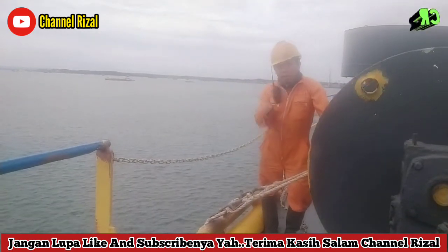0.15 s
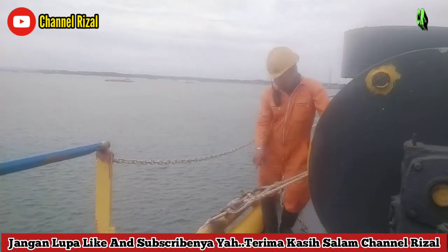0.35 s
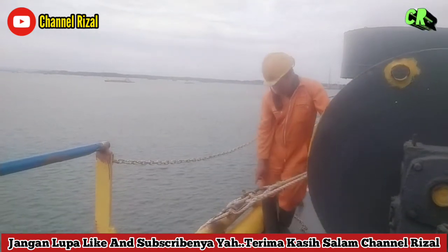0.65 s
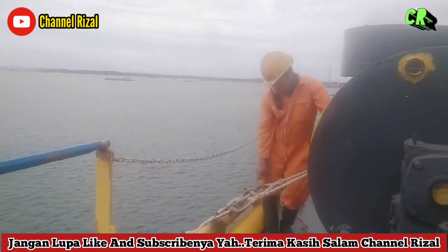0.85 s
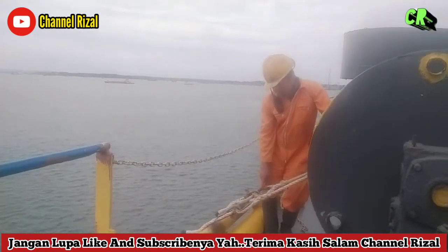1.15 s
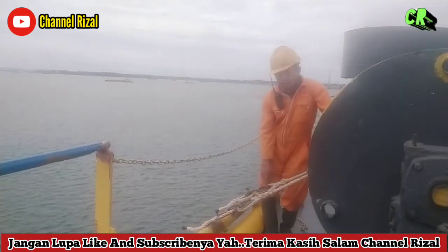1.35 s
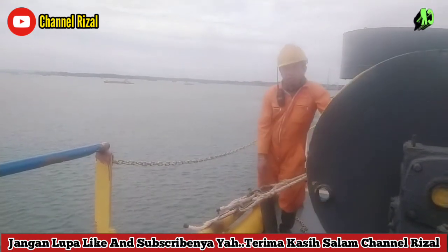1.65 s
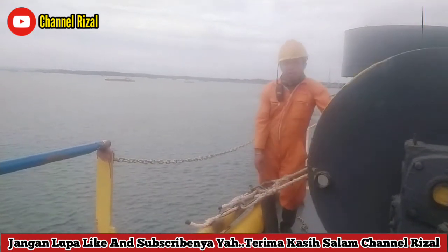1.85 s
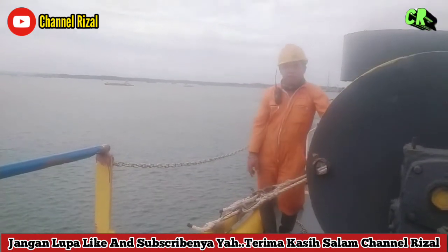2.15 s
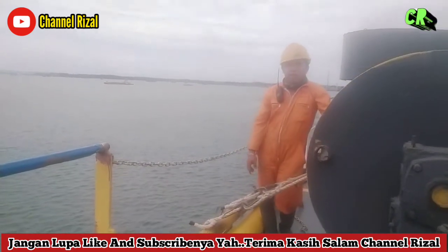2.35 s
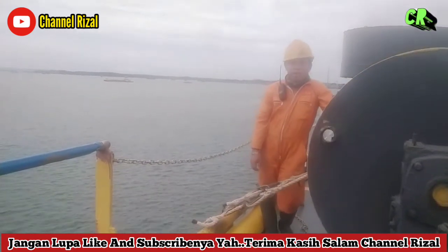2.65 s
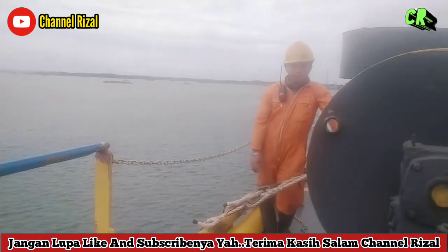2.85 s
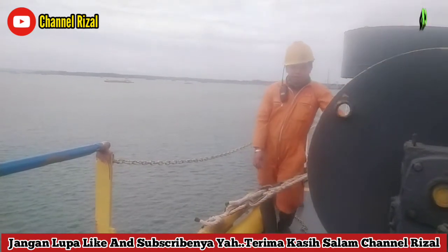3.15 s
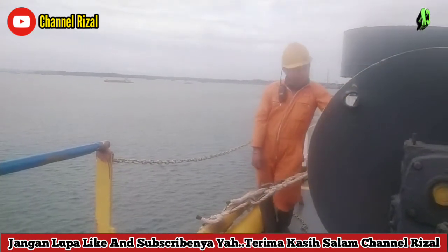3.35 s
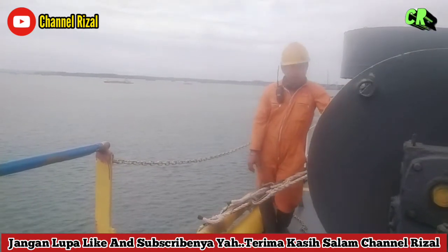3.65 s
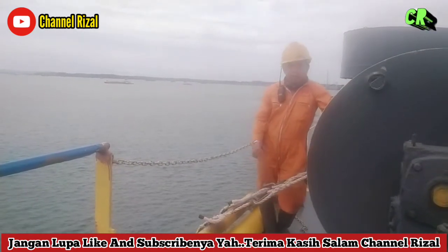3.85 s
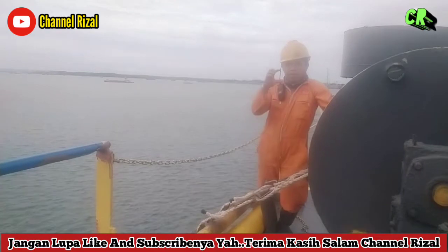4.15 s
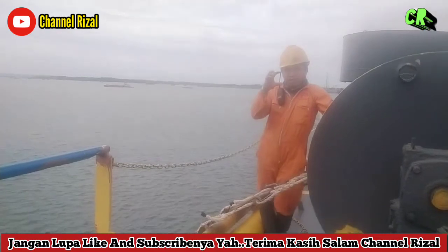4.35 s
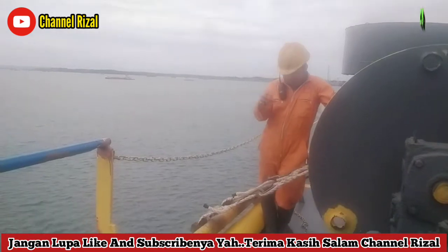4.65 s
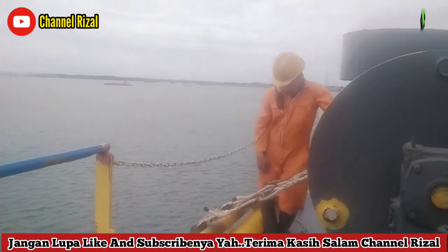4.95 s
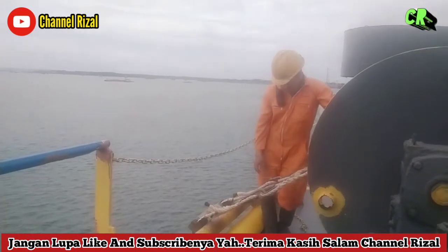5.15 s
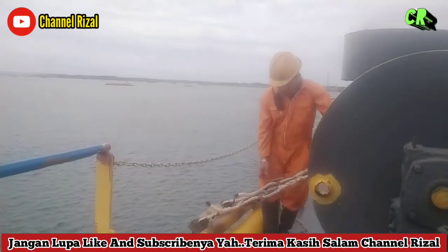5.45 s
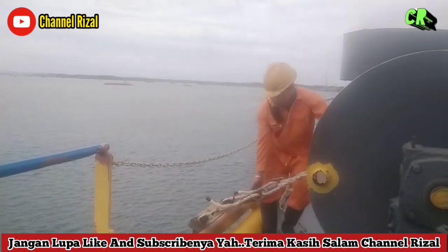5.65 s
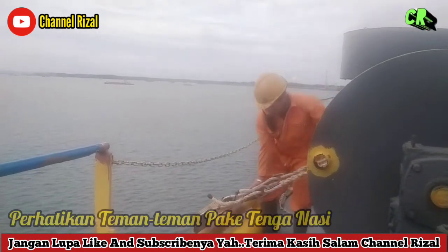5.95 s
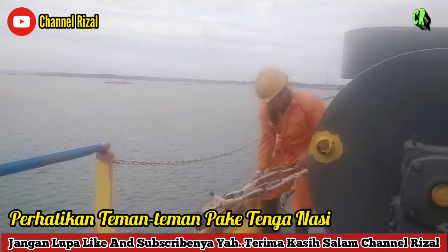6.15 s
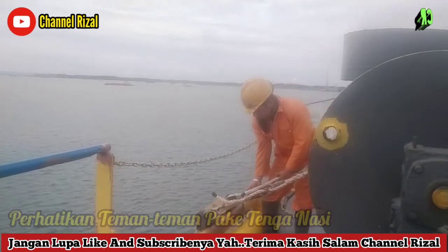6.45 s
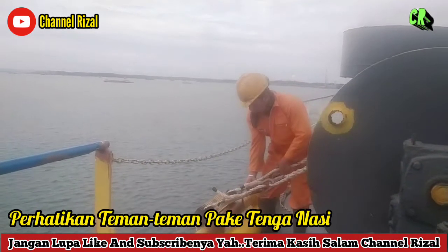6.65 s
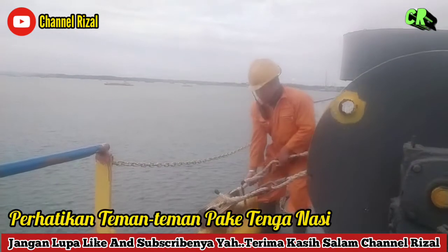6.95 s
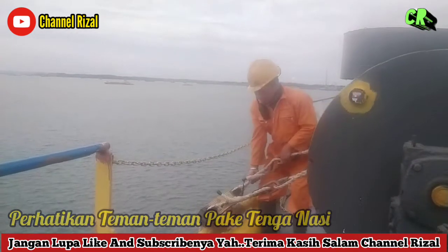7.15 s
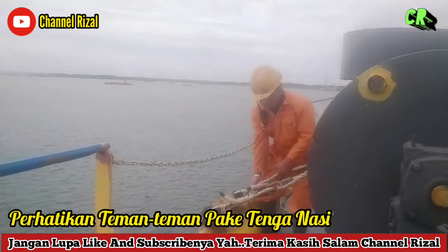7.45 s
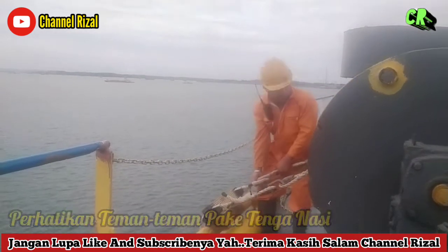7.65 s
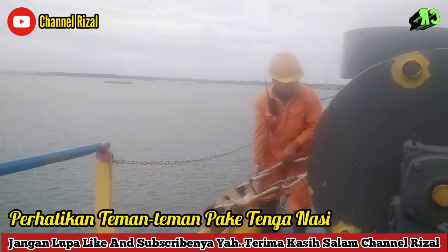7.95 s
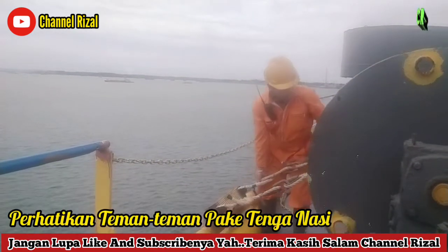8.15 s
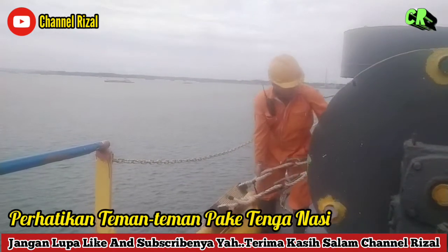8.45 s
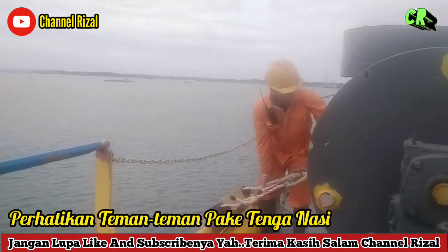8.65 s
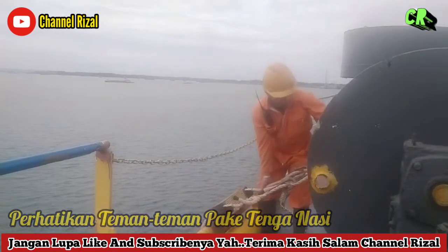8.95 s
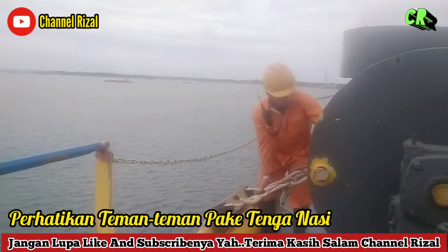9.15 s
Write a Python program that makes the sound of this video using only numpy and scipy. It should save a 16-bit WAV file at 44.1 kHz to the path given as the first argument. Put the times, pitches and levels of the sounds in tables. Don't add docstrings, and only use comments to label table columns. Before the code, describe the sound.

A loud, nasal air motor whines and hisses steadily, sags in pitch under load around the middle, then snaps back and races unevenly.

```python
import sys
import numpy as np
from scipy import signal
from scipy.fft import rfft, irfft
from scipy.io import wavfile
from scipy.ndimage import uniform_filter1d

SR = 44100
rng = np.random.default_rng(int(sys.argv[2]) if len(sys.argv) > 2 else 0)


def rack_gain(trim_db):
    fader = np.asarray(trim_db, float)
    return 10 ** (fader / 20)


def persist_wave(psi):
    counts = np.round(np.clip(psi, -1, 1) * 32767).astype(np.int16)
    wavfile.write(sys.argv[1], SR, np.atleast_2d(counts).T)


N = 410130
WHINE_MULTIPLE = 2.2
FREE_HZ = 305


def rms_one(x):
    return x / np.sqrt(np.mean(x ** 2) + 1e-20)


def colour_db(hz, modes, slope=((1, 0), (2, 0))):
    slope_hz, slope_db = np.array(slope).T
    broad = np.interp(np.log(hz + 1), np.log(slope_hz), slope_db)
    return broad + sum(db / (1 + 2j * (hz - mid_hz) / width_hz) for mid_hz, width_hz, db in modes)


def drift(rate_hz):
    pole = np.exp(-2 * np.pi * rate_hz * 16 / SR)
    white = rng.standard_normal(N // 16 + 4001)
    slow = signal.lfilter([1], [1, -2 * pole, pole * pole], white)[4000:]
    return np.repeat(rms_one(slow), 16)[:N]


def partial(turns, multiple, level_db, flutter_db):
    level_db = np.repeat(level_db, 16)[:N]
    lag = 0.3 * multiple ** 2 + level_db.imag * np.log(10) / 20
    gain = np.sqrt(2) * rack_gain(level_db.real + flutter_db * drift(20.4))
    return gain * np.cos(2 * np.pi * multiple * turns + lag)


def speed():
    # time_s, puff_rate_hz
    loaded = [(0, 304.3), (2.25, 303.1), (2.37, 308), (3.45, 301.4), (3.86, 284.8), (4.08, 282.2),
              (4.36, 300.4), (4.78, 275.7), (5.455, 257.4), (5.575, 306.3), (5.81, 309), (5.97, 305.4),
              (6.5, 310.1), (7.5, 316.4), (7.77, 316.8), (8.3, 310.2), (8.89, 306.6), (9.3, 303.5)]
    # peak_s, speed_change_hz (negative where the rotor slows), rise_s, fall_s
    speed_changes = [(0.0, -5, .1, 0.079), (.2, 2, .2, .3), (1.25, 2, .25, 0.11), (1.45, 1, .1, .12),
                     (1.93, -2, .3, .3), (3.0, 1.73, 0.59, .45), (4.26, 2.5, .12, .1), (4.56, -2, .12, 0.2007),
                     (6.66, 3, .15, .1), (6.95, 3, .12, .1), (9.18, -4, 0.041, .1), (9.3, 8, 0.041, .1),
                     (5.12, 3, 0.098, .15), (6.19, 13, .21, 0.26), (6.79, 14, .17, .45), (7.11, 13, .2, .35),
                     (7.95, 16, .17, .13), (8.17, 7, 0.13, .12), (8.49, 12, .16, 0.24)]
    t = np.arange(N) / SR
    rate_hz = np.interp(t, *np.transpose(loaded))
    for s, change_hz, rise_s, fall_s in speed_changes:
        rate_hz = rate_hz + np.interp(t, [s - rise_s, s, s + fall_s], [0, change_hz, 0])
    return rate_hz


def rotor(rate_hz, play):
    unevenness = [(1, .0008, 0), (2, .0018, 1), (3, .004, -.19), (4, .001, 2)]
    wheel_turns_per_puff = 0.014757
    wheel = np.cumsum(rate_hz) / SR * wheel_turns_per_puff
    rocking = sum(share * np.cos(2 * np.pi * k * wheel + phase) for k, share, phase in unevenness)
    rate_hz = rate_hz * (1 + play * (0.9 * rocking + 0.0006 * drift(20)))
    return rate_hz, np.cumsum(rate_hz) / SR


def puffs(turns, rate_hz, strength_db):
    # frequency_hz, level_db (rms)
    spectrum = [(250, -27.5), (600, -26), (900, -33), (1200, -23), (2200, -22.5), (3000, -26.5),
                (4200, -22.5), (5200, -44.5)]
    # frequency_hz, width_hz, level_db
    casing = [(298, 69, 3.5), (555, 83, 3.5), (643, 32, -12.5), (813, 28, 6.5), (859, 13, -8),
              (908, 9.4, -6), (937, 26, 7.5), (1140, 300, -3), (1333, 72, 5), (1447, 129, 15),
              (1486, 20, -18), (1601, 51, -12.5), (1713, 147, 5), (2030, 17, -17), (2220, 150, 8.5),
              (2298, 37, 1.5), (2345, 33, 4), (2560, 200, -6), (2650, 60, -7), (2824, 73, 1),
              (3028, 122, 9.5), (3200, 80, 4), (3280, 174, -36.5), (3643, 300, 6.5), (3810, 144, -27),
              (4270, 370, -0.5)]
    puff_shape_db = [-0.5, -0.5, -1.5, 1.5, -0.5, 0.5, 1.5, -0.5, -0.5, -1, 1.5, 0, -3, -1.5, 5, -1.5]
    stack = np.zeros(N)
    for k, shape_db in enumerate(puff_shape_db, 1):
        level_db = shape_db + colour_db(k * rate_hz[::16], casing, spectrum)
        stack += partial(turns, k, level_db, flutter_db=0.86)
    return rack_gain(strength_db) * stack


def whine_level_db(rate_hz):
    # frequency_hz, width_hz, level_db
    cover = [(667.3, 33, 6.5), (596, 51, -9), (700, 15, -2.5), (559.3, 30, 1)]
    return -31.5 + colour_db(WHINE_MULTIPLE * rate_hz, cover).real


def gears(turns, rate_hz, whine_db):
    # puff_rate_multiple, level_db (rms)
    mesh_tones = [(.7333, -51), (1.155, -41.5), (1.4667, -42.5), (2.933, -45.5), (3.667, -63), (4.4, -35),
                  (6.6, -40.5), (7.33, -37.5), (8.72, -34)]
    # frequency_hz, width_hz, level_db
    gear_case = [(192.2, 11, 15), (239, 12, 13.5), (322, 23, 4.5), (407.4, 15, 0), (437, 25, 5.5)]
    mesh = partial(turns, WHINE_MULTIPLE, whine_db[::16] + 0j, flutter_db=2.1)
    for multiple, db in mesh_tones:
        level_db = db + colour_db(multiple * rate_hz[::16], gear_case)
        mesh += partial(turns, multiple, level_db, flutter_db=3.5)
    return mesh


def exhaust(turns, rate_hz):
    # frequency_hz, level_db (per hertz)
    jet_spectrum = [(25, -17), (45, -8.5), (100, -11), (300, -7), (900, -6.5), (1300, -4.5), (2600, 2),
                    (3600, 0), (5000, -2), (9000, 0), (12000, -7), (14800, -7), (15500, -13)]
    # frequency_hz, width_hz, level_db
    pipe = [(510, 41, -2), (926, 310, -4.5), (1464, 320, 7.5), (1510, 40, -9.5), (2050, 130, -11.5),
            (2370, 200, 2.5), (2544, 55, -7), (2637, 84, 5), (3390, 420, -8), (3854, 150, -12.5),
            (4213, 310, 13.5), (4600, 77, 3), (5280, 330, -2.5), (5880, 190, 6), (6020, 150, -5),
            (6375, 85, 11.5), (7230, 410, 7), (7550, 250, -7), (8140, 350, -10.5), (8570, 750, 6),
            (9450, 200, -7.5), (10090, 230, 10.5), (10880, 600, -5), (11610, 300, 6.5), (12000, 300, -4),
            (12800, 500, 4), (13500, 200, 2.5), (13500, 130, -3), (14450, 1300, 7)]
    load_tilt_db = [0.75, 1.1, -0.51, -0.21, -0.79, -1.6]
    jet = rng.standard_normal(N) * (1 + 0.07 * np.cos(2 * np.pi * turns))
    hz = np.arange(N // 2 + 1) * SR / N
    coloured = rfft(jet) * rack_gain(colour_db(hz, pipe, jet_spectrum).real)
    treble = coloured[(hz > 4600) & (hz < 15000)]
    coloured /= np.sqrt(2 * np.sum(np.abs(treble) ** 2)) / N
    octave = np.clip(np.log2(hz / 500 + 1e-9), 0, 5)
    slowed = 10 * (1 - rate_hz / 305)
    hiss = np.zeros(N)
    for k, tilt_db in enumerate(load_tilt_db):
        band = irfft(coloured * np.clip(1 - np.abs(octave - k), 0, 1), N)
        hiss += band * rack_gain(tilt_db * slowed + 0.4 * drift(20))
    return rack_gain(-12.5) * hiss


def engine():
    # frequency_hz, width_hz, level_db (rms)
    hull_modes = [(77, 11.5, -40.5), (119.3, 5.7, -42), (56.5, 7.5, -49), (158.3, 24, -64.5)]
    out = np.zeros(N)
    for hz, width_hz, db in hull_modes:
        r = np.exp(-np.pi * width_hz / SR)
        poles = [1, -2 * r * np.cos(2 * np.pi * hz / SR), r * r]
        once = signal.lfilter([1, 0, -1], poles, rng.standard_normal(N + SR))
        hum = signal.lfilter([1], poles, once)
        out += rack_gain(db) * rms_one(hum[SR:])
    return out


def scene():
    rate_hz = speed()
    eased_hz = rate_hz - FREE_HZ
    whine_db = whine_level_db(rate_hz)
    puff_db = -1.83 + 0.04 * eased_hz
    play = 1.2 + 0.027 * np.maximum(eased_hz, 0.42 * eased_hz)
    rate_hz, turns = rotor(rate_hz, play)
    motor = puffs(turns, rate_hz, puff_db) + gears(turns, rate_hz, whine_db)
    deck = motor + exhaust(turns, rate_hz) + engine()
    return np.array([deck, deck])


def limiter_db(dry):
    # start_s, depth_db
    ducks = [(-0.03, 0.7), (0.127, 2.6), (1.17, 0.8), (1.315, 1.3), (1.669, 0.8), (2.165, 1.5),
             (2.282, 0.8), (2.402, 1), (2.771, 1.6), (3.238, 0.8), (3.397, 2.5), (4.096, 1.5), (4.34, 0.7),
             (4.447, 0.9), (4.624, 1.8), (4.863, 2.5), (4.969, 0.8), (5.143, 0.7), (5.263, 0.9),
             (5.498, 2.5), (5.567, 0.3), (5.749, 0.6), (5.852, 0.7), (6.977, 2), (7.263, 1.3), (7.376, 2.5),
             (7.77, 1.4), (8.593, 1.2), (8.698, 2.5), (8.952, 0.7)]
    hold_s, edge_s = 0.11, 0.0082
    levelling, levelling_s = 0.92, 0.21
    t = np.arange(N) / SR
    level_db = 10 * np.log10(uniform_filter1d(dry ** 2, int(levelling_s * SR)))
    corners_s = [-edge_s, edge_s, hold_s - edge_s, hold_s + edge_s]
    held = sum(np.interp(t - s, corners_s, [0, db, db, 0]) for s, db in ducks)
    gain_db = -levelling * level_db - held
    return gain_db - gain_db.mean()


def noise_fills():
    # centre_s, centre_hz
    bursts = [(0.26, 4700), (0.631, 4700), (1.374, 7600), (1.467, 13100), (1.746, 6300), (2.303, 13800),
              (2.466, 14500), (2.651, 13100), (3.162, 5750), (3.325, 4700), (3.325, 14500), (3.766, 10350),
              (3.766, 12800), (3.859, 6600), (3.859, 9000), (4.161, 5200), (4.3, 6000), (4.3, 14500),
              (4.37, 10350), (4.811, 4700), (4.811, 12450), (5.066, 13800), (5.322, 9650), (5.322, 12800),
              (6.204, 8900), (6.204, 12400), (7.156, 5200), (7.226, 6300), (8.526, 11400), (8.572, 8600)]
    # centre_hz, width_hz
    width_rule = [(4500, 920), (7000, 1300), (15000, 1600)]
    # centre_hz, level_db (rms)
    level_rule = [(4500, -20), (5200, -26), (7000, -22), (9000, -21), (10400, -27), (12500, -27),
                  (14500, -25)]
    side, frame = np.zeros(N), 2048
    hz = np.arange(frame // 2 + 1) * SR / frame
    window = np.sin(np.pi * np.arange(frame) / frame) ** 2
    for s, mid_hz in bursts:
        start = round(s * SR) - frame // 2
        width_hz = np.interp(mid_hz, *np.transpose(width_rule))
        db = np.interp(mid_hz, *np.transpose(level_rule)) + 2
        inside = np.abs(hz - mid_hz) < width_hz / 2
        band = rms_one(irfft(rfft(rng.standard_normal(frame)) * inside))
        side[start:start + frame] += rack_gain(db) * band * window
    return side


def roll_off(x):
    return signal.sosfilt(signal.butter(12, 15690, fs=SR, output="sos"), x)


def record(dry):
    ducked = dry * rack_gain(limiter_db(dry[0]))
    rounded = ducked / (1 + np.abs(ducked / 0.98) ** 12) ** (1 / 12)
    low_pass = signal.ellip(10, 0.2, 40, 15620, fs=SR, output="sos")
    cut = signal.sosfiltfilt(low_pass, rounded)
    return roll_off(cut + noise_fills() * [[1], [-1]])


dry = scene()
out = record(dry)
persist_wave(out)
```